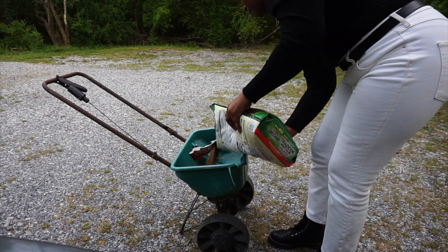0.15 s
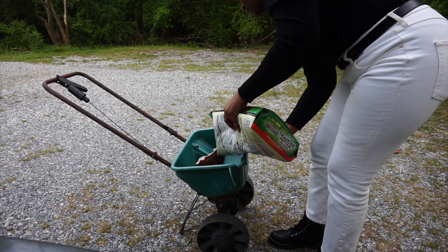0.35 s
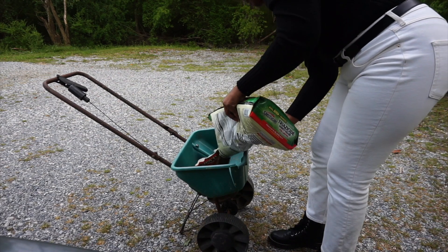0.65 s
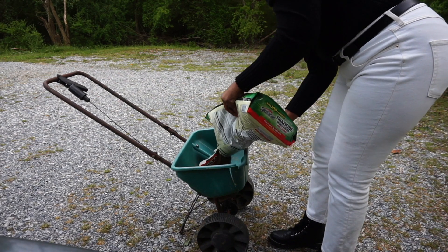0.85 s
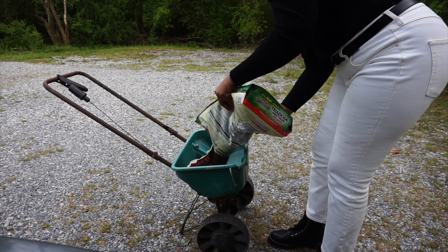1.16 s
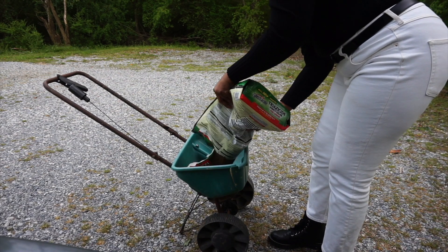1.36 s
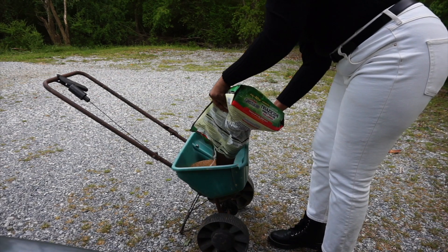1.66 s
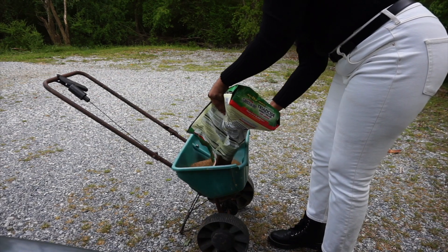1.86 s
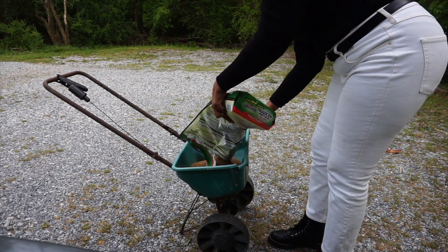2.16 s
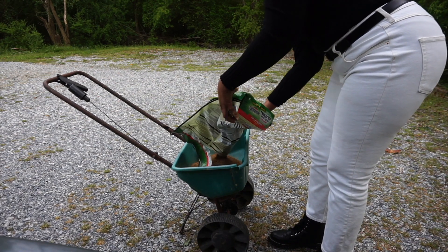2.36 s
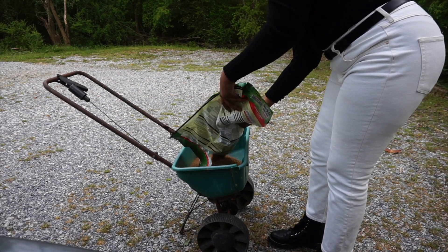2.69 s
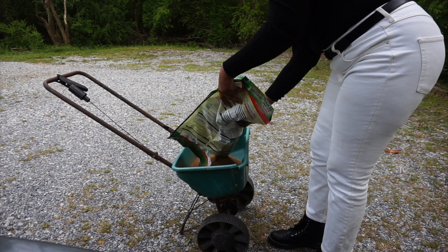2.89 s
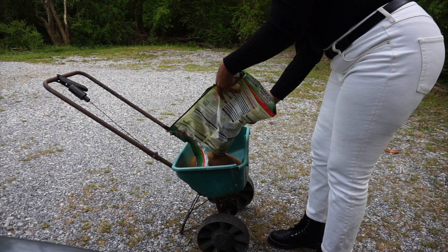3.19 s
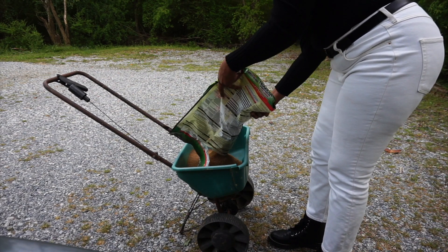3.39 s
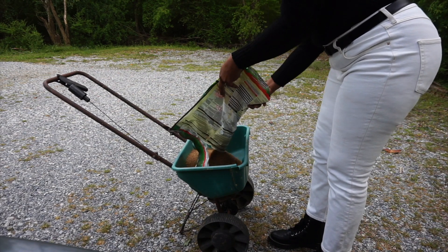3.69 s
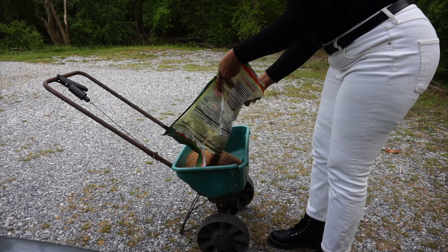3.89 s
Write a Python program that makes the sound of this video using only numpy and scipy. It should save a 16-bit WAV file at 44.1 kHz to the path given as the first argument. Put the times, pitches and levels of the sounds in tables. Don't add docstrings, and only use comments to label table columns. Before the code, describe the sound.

Dry granules hiss steadily from a plastic bag into a hollow plastic hopper, swelling in surges, with bag pops, crackles and rattling clumps.

```python
import sys
import numpy as np
from scipy import signal
from scipy.fft import rfft, irfft
from scipy.io import wavfile

SR = 44100
rng = np.random.default_rng(int(sys.argv[2]) if len(sys.argv) > 2 else 0)


def boost_factor(decibels):
    exponent = np.asarray(decibels, float) / 20
    return 10 ** exponent


def dump(signal):
    limited = np.clip(np.atleast_2d(signal).T, -1, 1)
    pcm = np.round(limited * 32767).astype(np.int16)
    wavfile.write(sys.argv[1], SR, pcm)


N = 178119
HOLLOW_HZ = 303.5


def rms_one(x):
    return x / np.sqrt(np.mean(x ** 2) + 1e-20)


def peak_one(x):
    return x / np.max(np.abs(x[0]))


def in_time(rows):
    s, db = np.transpose(rows)
    return np.interp(np.arange(N) / SR, s, db)


def at_hz(points, hz):
    curve_hz, values = np.transpose(points)
    return np.interp(np.log(hz), np.log(curve_hz), values)


def add(out, piece, s):
    i = round(s * SR)
    out[:, i:i + piece.shape[1]] += piece[:, :N - i]


def drift(rate):
    r = np.exp(-80 * np.pi * rate / SR)
    noise = rng.standard_normal(N // 40 + 2002)
    slow = signal.lfilter([1], [1, -2 * r, r * r], noise)[2000:]
    return np.interp(np.arange(N) / 40, np.arange(len(slow)), rms_one(slow))


def resonance(x, hz, width_hz):
    r = np.exp(-np.pi * width_hz / SR)
    ringing = [1, -2 * r * np.cos(2 * np.pi * hz / SR), r * r]
    return signal.lfilter(np.array([1, 0, -1]) * (1 - r * r) / 2, ringing, x)


def spread(mid, side, hz):
    # f/Hz, likeness (0 to 1)
    likeness = [(60, 1), (130, 0.89), (300, 0.91), (600, 0.86), (1100, 0.89), (1600, 0.53), (2500, 0.87),
                (3700, 0.52), (5500, 0.64), (7000, 0.5), (8200, 0.84), (8500, 0.95), (10300, 0.93),
                (10700, 0.69)]
    # f/Hz, level/dB
    left_shade = [(60, -1), (110, 1), (190, 5), (350, -3), (620, -1.5), (1110, -7), (2000, -3),
                  (3580, -2.5), (6420, -0.5), (11500, -2)]
    alike = np.clip(at_hz(likeness, hz), 0, 1)
    half_db = at_hz(left_shade, hz) * np.array([[.5], [-.5]])
    ports = np.sqrt(1 + alike) * mid + np.sqrt(1 - alike) * side * [[1], [-1]]
    return ports * boost_factor(half_db)


def grains(per_s, spread_db):
    size_db = spread_db * np.minimum(rng.exponential(1, (2, 2, N)), 5)
    sizes = boost_factor(size_db) * rng.choice([-1, 1], (2, 2, N))
    return sizes * (rng.random((2, 2, N)) < per_s / SR) + 1e-18


def coloured(impacts, spectrum, surge_db, flicker_db):
    out = 0
    surge = drift(7.4) + 0.36 * drift(31.0)
    low_hz, top_hz = spectrum[0][0], spectrum[-1][0]
    edges = np.geomspace(low_hz, top_hz, int(3 * np.log2(top_hz / low_hz)) + 2)
    for k, (low, high) in enumerate(zip(edges, edges[1:])):
        band = signal.butter(2, [low, high], "band", fs=SR, output="sos")
        mid, side = signal.sosfilt(band, impacts[k % 2])
        hz = np.sqrt(low * high)
        gain = boost_factor(at_hz(spectrum, hz) + surge_db * surge + flicker_db * drift(15.0))
        out = out + gain * spread(mid, side, hz)
    return rms_one(out)


def flow():
    # t/s, level/dB
    slow_flow = [(0, -38.5), (.06, -29), (.31, -37), (.42, -31), (.52, -34.5), (.86, -34.5), (1.02, -32.5),
                 (1.28, -25.5), (1.57, -29), (2.35, -27), (2.58, -24.5), (2.68, -27), (2.82, -25.5),
                 (3.22, -23.5), (3.42, -27.5), (3.5, -27), (3.65, -31), (4.04, -25)]
    # t/s, gain level/dB
    slumps = [(.21, 1.5), (.6, 2.5), (.69, 2), (1.68, 1.5), (1.93, 2.5), (2.18, 1.5), (2.26, 2),
              (2.46, 0.5), (3.8, 1.5), (3.94, 1)]
    t, slump_s = np.arange(N) / SR, 0.042
    return in_time(slow_flow) + sum(db * np.exp(-((t - s) / slump_s) ** 2) for s, db in slumps)


def swing(flow_db):
    return flow_db + 27.5


def rush_level(flow_db):
    return -26 + 0.84 * swing(flow_db)


def lifted():
    lift_s, lifting_s = 3.16, .1
    return np.clip((np.arange(N) / SR - lift_s) / lifting_s, 0, 1)


def hiss(flow_db):
    # f/Hz, level/dB (per Hz)
    spectrum = [(1650, -37), (2800, -8), (3210, -9), (3960, -10.5), (4260, -7.5), (4670, -10), (5800, -2),
                (6880, -7.5), (9510, -2.5), (10900, -9), (14200, -57), (22000, -120)]
    return boost_factor(flow_db) * coloured(grains(14000.0, 1.8), spectrum, surge_db=0.72, flicker_db=0.4)


def rush(flow_db):
    # f/Hz, level/dB (per Hz)
    spectrum = [(530, -17), (900, -9.5), (995, -10), (1090, -7.5), (1350, -4), (1440, -2.5), (1640, -5.5),
                (2220, 2), (2820, -1), (4000, -9), (5200, -12.5), (8800, -120)]
    drumming = coloured(grains(5000.0, 2.02), spectrum, surge_db=0.5, flicker_db=1.28)
    return boost_factor(rush_level(flow_db)) * drumming


def slide(flow_db):
    # f/Hz, level/dB (per Hz)
    spectrum = [(250, -53), (420, -8), (610, -3), (668, -5), (761, 1), (994, -5.5), (1090, -2), (1400, -2),
                (1820, -19), (3080, -120)]
    # t/s, level/dB
    tip = [
        (0, -41),
        (.12, -36),
        (.62, -42.5),
        (.8, -46),
        (1.25, -46),
        (1.5, -37.5),
        (2.16, -32),
        (2.4, -41.5),
        (3.15, -28.5),
    ]
    clear = lifted()
    after_db = -34 + 0.49 * swing(flow_db)
    level_db = (1 - clear) * in_time(tip) + clear * after_db
    return boost_factor(level_db) * coloured(grains(1500.0, 3.5), spectrum, surge_db=1.5, flicker_db=2.0)


def patches(low_hz, top_hz, per_s, width_hz):
    impacts = grains(per_s, 2.35)[0]
    patch = rng.integers(0, 24, N)
    out = 0
    for k, hz in enumerate(np.geomspace(low_hz, top_hz, 24)):
        ringing = resonance(impacts * (patch == k) + 1e-18, hz, width_hz)
        out = out + spread(*ringing, hz)
    return rms_one(out)


def pings(flow_db):
    low = boost_factor(rush_level(flow_db) - 9.5) * patches(1713.0, 3016.0, 500.0, 72.0)
    high = boost_factor(flow_db - 10.5) * patches(3582.0, 10500.0, 900.0, 73.0)
    return low + high


def hollow():
    wall_hz, wall_width_hz, wall_db = 518, 190, -1
    clear = lifted()
    sagging_db = -48.5 + 1.83 * np.arange(N) / SR
    level_db = (1 - clear) * sagging_db + clear * -52
    knocks = grains(400.0, 3.9)
    air = resonance(resonance(knocks[0], HOLLOW_HZ, 89), HOLLOW_HZ, 144.0)
    wall = resonance(resonance(knocks[0] + knocks[1], wall_hz, wall_width_hz), wall_hz, 400.0)
    air, wall = rms_one(spread(*air, HOLLOW_HZ)), rms_one(spread(*wall, wall_hz))
    return boost_factor(level_db) * (air + boost_factor(wall_db) * wall)


def rumble():
    # f/Hz, level/dB (per Hz)
    spectrum = [(15, -43), (25, -7.5), (65, -2.5), (98, -2.5), (188, -14.5), (260, -5.5), (340, -38),
                (570, -120)]
    noise = rng.standard_normal((2, 2, N))
    return boost_factor(-49) * coloured(noise, spectrum, surge_db=-1.4, flicker_db=-3.5)


def rattles():
    # t/s, peak level/dB, centre f/Hz, width f/Hz, length t/s
    clumps = [(.008, -28, 493, 400, 0.0058), (.732, -13.5, 2500, 2170, 0.0095),
              (1.105, -24, 594, 600, 0.0035), (2.804, -12.5, 1900, 900, 0.0065),
              (2.863, -10, 1300, 1780, 0.016), (2.956, -22, 1120, 1200, 0.0043),
              (3.017, -19, 1200, 1200, .008), (3.077, -9, 1100, 1390, 0.01),
              (3.169, -12, 1380, 1780, 0.016), (3.178, -14.5, 700, 900, 0.014),
              (2.802, -5, 1980, 1000, .0005), (1.983, -25, 1420, 80, .03), (2.242, -23.5, 1440, 90, 0.013),
              (3.074, -4, 1490, 900, 0.0005), (2.867, -13, 1200, 1500, 0.00097),
              (3.087, -14, 1100, 1000, 0.0022)]
    out, t = np.zeros((2, N)), np.arange(2048) / SR
    for s, peak_db, hz, width_hz, length_s in clumps:
        hits = rng.standard_normal((2, 2048)) * (rng.random((2, 2048)) < 2500.0 / SR)
        hits[:, 10] = [1.5, .5]
        swell = np.sin(np.pi * np.clip(t / length_s, 0, 1)) ** .5
        clump = peak_one(resonance(resonance(hits * swell, hz, width_hz), hz, 2 * width_hz))
        add(out, boost_factor(peak_db) * spread(*clump, hz), s)
    return out


def burst(length_s, snaps_per_s):
    t = np.arange(2048) / SR
    snaps = rng.standard_normal((2, 2048)) * (rng.random((2, 2048)) < snaps_per_s / SR)
    shock = snaps * np.exp(-t / np.clip(length_s, .0005, .015))
    shock[:, 0] = [1.9, .6]
    return shock


def buckles():
    # t/s, peak level/dB, centre f/Hz, hollow thump level/dB
    folds = [(.009, -27, 477, -31), (.097, -21, 536, -46), (.425, -26, 645, -29), (.443, -26, 641, -30),
             (.581, -25.5, 896, -32), (.734, -27, 800, -35), (.954, -28.5, 784, -49),
             (1.107, -25.5, 503, -28), (1.264, -27.5, 423, -29), (1.391, -28, 704, -29),
             (1.416, -23.5, 950, -32), (2.063, -35, 807, -34), (2.104, -12, 870, -25),
             (2.124, -16, 710, -40), (2.151, -22, 867, -27.5), (2.216, -19, 750, -28),
             (2.441, -29, 956, -26), (2.468, -22.5, 970, -27), (2.496, -26, 921, -30),
             (2.604, -24, 403, -32), (2.639, -21.5, 557, -25), (2.688, -26, 988, -26),
             (2.798, -25, 690, -27), (2.866, -15.5, 950, -18.5), (2.957, -16.5, 750, -44),
             (3.018, -22, 890, -33), (3.0765, -8, 770, -14.5), (3.082, -11.5, 500, -22),
             (3.124, -18, 736, -21), (3.172, -15, 604, -24)]
    out = np.zeros((2, N))
    for s, peak_db, hz, thump_db in folds:
        length_s = 0.0048 * (1 - 0.02 * (peak_db + 27))
        shock = burst(length_s, 1300.0)
        edge = peak_one(resonance(resonance(shock, 1200.0, 1600.0), 1100.0, 3200.0))
        film = peak_one(resonance(resonance(shock, hz, 0.64 * hz), hz, 0.51 * hz))
        film = film + boost_factor(-9) * edge
        bent_hz = HOLLOW_HZ * (1 + 0.088 * shock[1, 1:40].sum().clip(-.5, 2))
        thump = peak_one(resonance(resonance(shock, bent_hz, 86.0), bent_hz, 230.0))
        pop = boost_factor(peak_db - 2.0) * spread(*film, hz)
        add(out, pop + boost_factor(thump_db - 4.5) * spread(*thump, HOLLOW_HZ), s)
    return out


def creases():
    # t/s, peak level/dB, centre f/Hz, length t/s
    cracks = [(1.382, -8.5, 2420, 0.0033), (1.562, -25, 2050, .003), (1.839, -8, 2460, 0.0042),
              (1.936, -5, 2160, 0.0035), (1.959, -10, 2770, .003), (2.155, -7.5, 2550, .002),
              (2.642, -5, 2200, .003), (2.731, -9, 2350, .0025), (2.808, -7, 1900, 0.0018),
              (3.804, -12, 2740, .003), (3.92, -11, 1800, .004), (4.016, -13, 1300, 0.0056)]
    out = np.zeros((2, N))
    for s, peak_db, hz, length_s in cracks:
        shock = burst(length_s, 1700.0)
        crack = peak_one(resonance(resonance(shock, hz, 0.26 * hz), hz, 2 * hz))
        add(out, boost_factor(peak_db - 6.5) * spread(*crack, hz), s)
    return out


def hopper(x):
    # f/Hz, width f/Hz, level/dB
    rises_and_dips = [(364, 37, 1), (670, 75, -11), (748, 30, 3.5), (988, 38, -32), (1300, 25, 5.5),
                      (1335, 74, -12), (1443, 62, 6.5), (1518, 25, -19), (1680, 24, -2), (1765, 47, 8),
                      (1797, 55, -10.5), (2185, 39, 3.5), (2520, 165, 2.5), (3200, 150, 0.5),
                      (4375, 41, 4.5), (4890, 150, 3), (5830, 106, 2.5), (7050, 290, 0), (1930, 22, 0.5),
                      (2740, 32, 2.5), (3840, 140, -1), (4880, 47, -13), (9600, 900, 3)]
    mid_side = np.stack([x[0] + x[1], x[0] - x[1]]) / 2
    for hz, width_hz, db in rises_and_dips:
        change = boost_factor(db * np.array([[1], [.4]])) - 1
        mid_side = mid_side + change * resonance(mid_side, hz, width_hz)
    return np.stack([mid_side[0] + mid_side[1], mid_side[0] - mid_side[1]])


def scene():
    flow_db = flow()
    falling = hiss(flow_db) + rush(flow_db) + slide(flow_db) + pings(flow_db)
    inside = falling + hollow() + rattles()
    return hopper(inside) + buckles() + creases() + rumble()


def roll_off(x):
    return signal.sosfilt(signal.butter(12, 11020, fs=SR, output="sos"), x)


def record(dry):
    # f/Hz, phase/radians
    left_leads = [(0, 0.12), (950, 0.38), (1460, 0.12), (1720, 0.83), (1980, -0.31), (2760, 0.47),
                  (3880, 1.0), (4130, 0.57), (4570, 1), (5170, 0.57), (5860, -0.079), (6550, 0.4),
                  (7670, 0.23), (11700, -0.39)]
    hz, radians = np.transpose(left_leads)
    lead = np.interp(np.arange(N // 2 + 1) * SR / N, hz, radians)
    x = irfft(rfft(dry) * np.exp(.5j * lead * [[1], [-1]]), N)
    x = signal.sosfilt(signal.butter(2, 35.0, "high", fs=SR, output="sos"), x)
    return roll_off(np.clip(x, -.93, .93))


dry = scene()
out = record(dry)
dump(out)
```